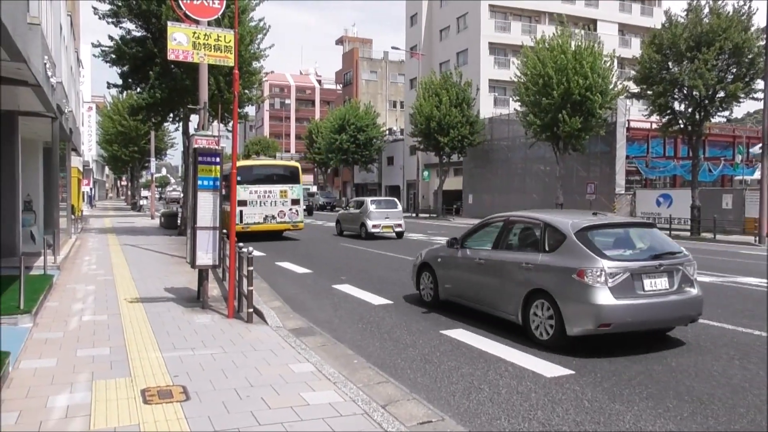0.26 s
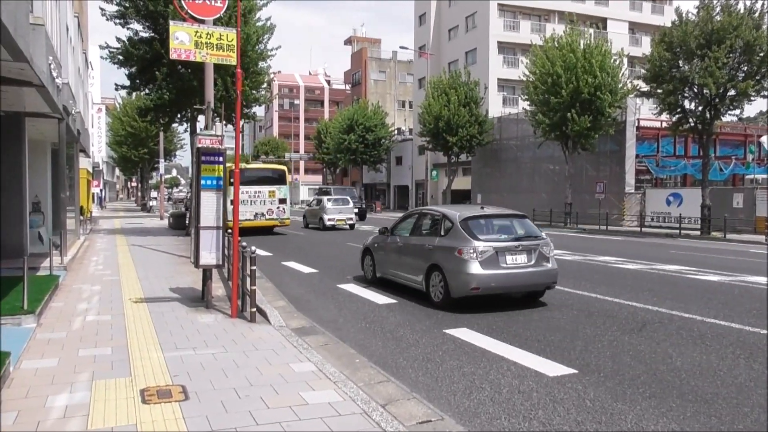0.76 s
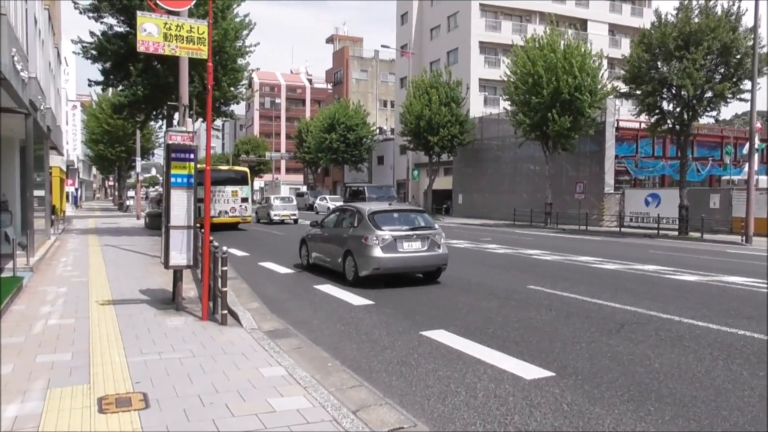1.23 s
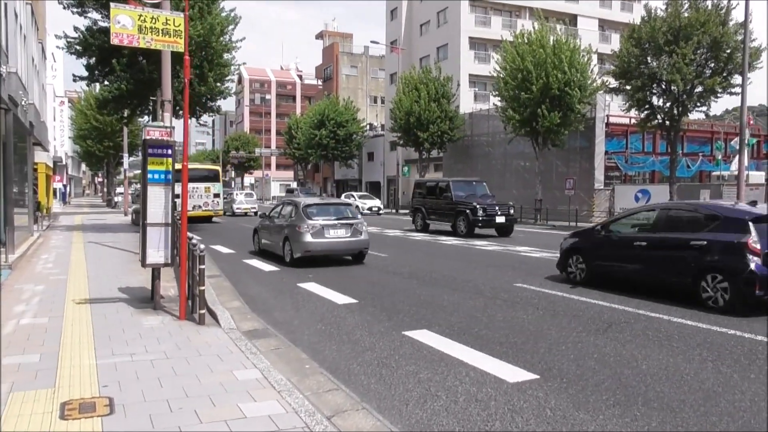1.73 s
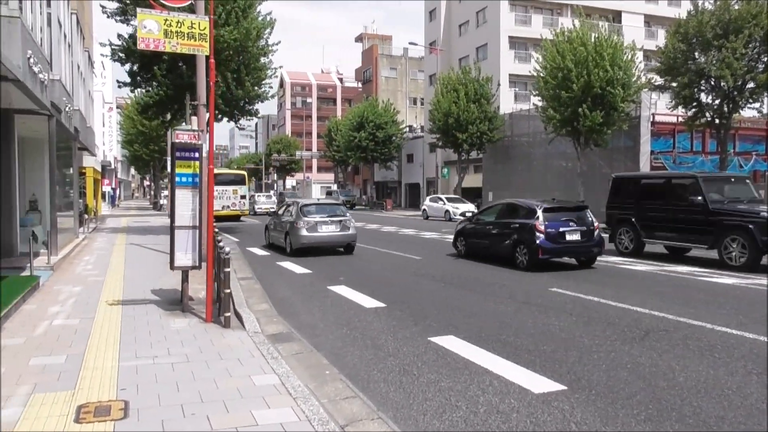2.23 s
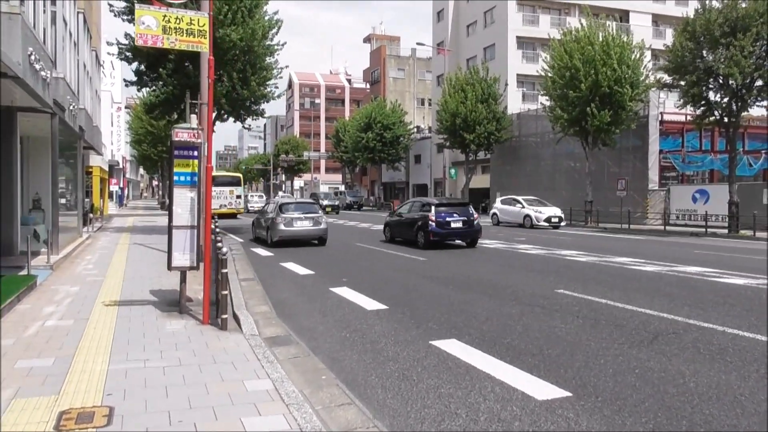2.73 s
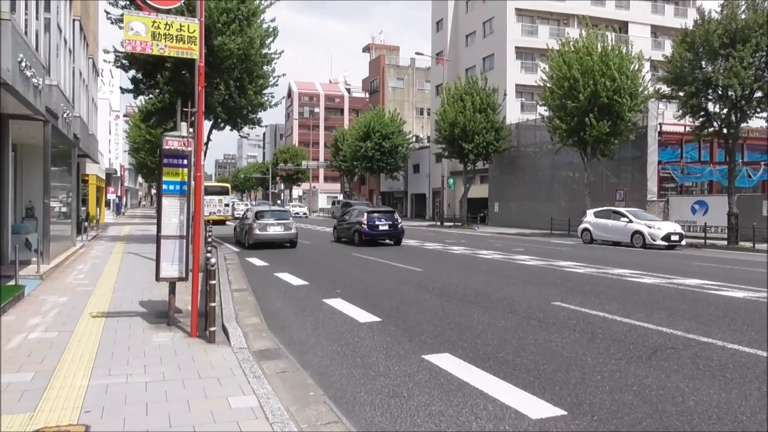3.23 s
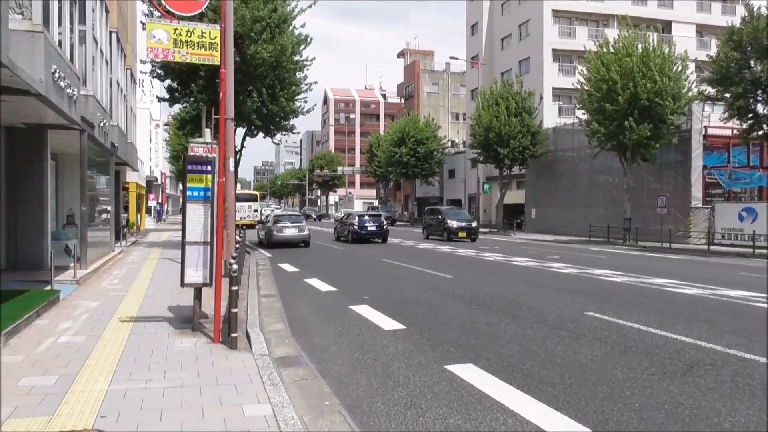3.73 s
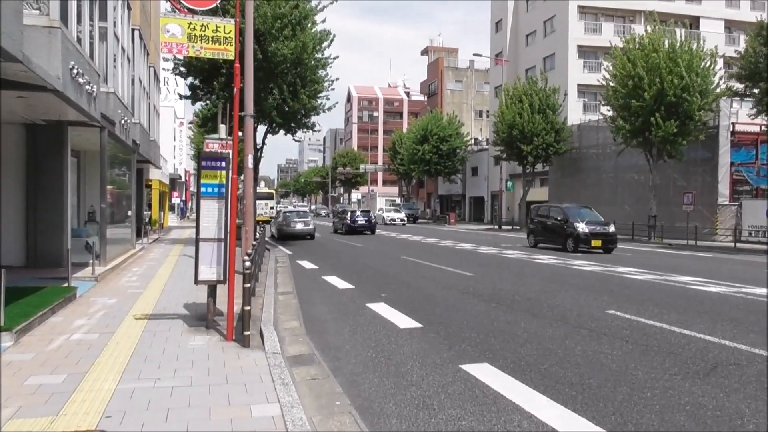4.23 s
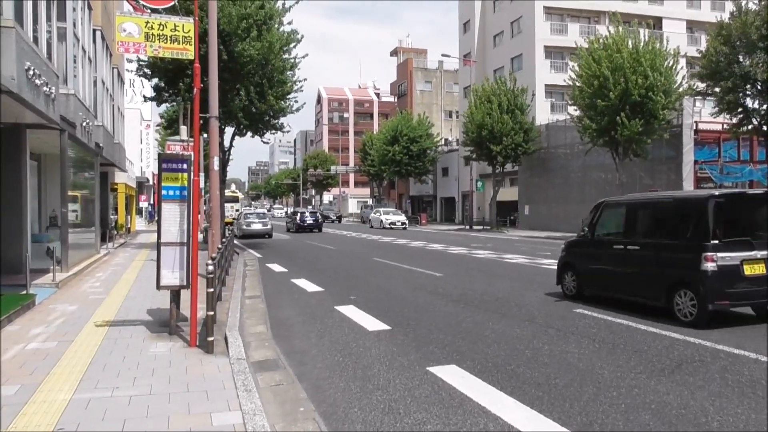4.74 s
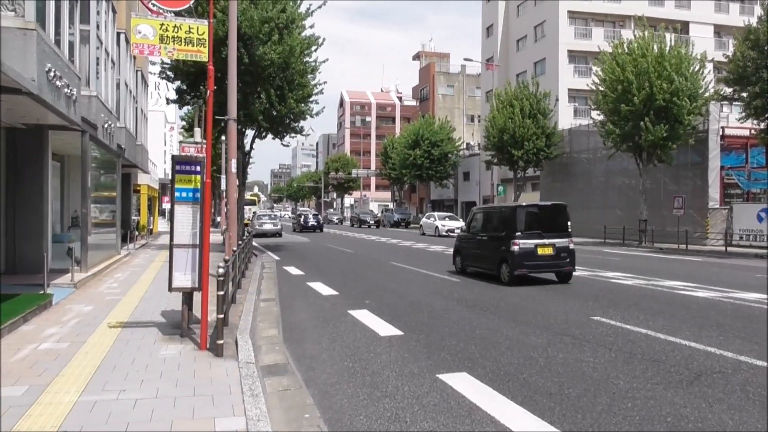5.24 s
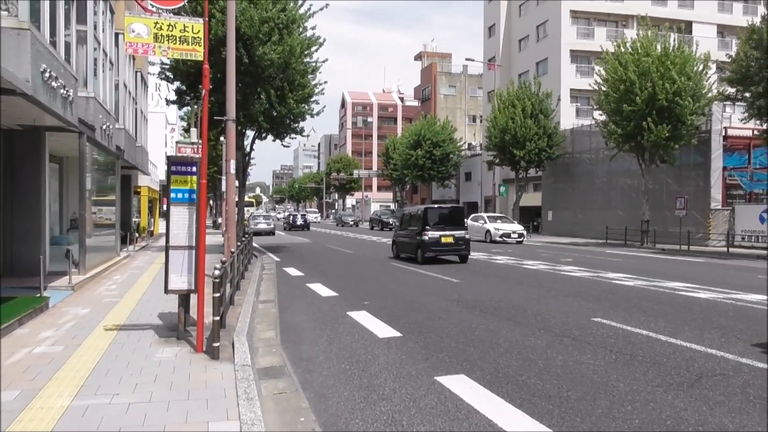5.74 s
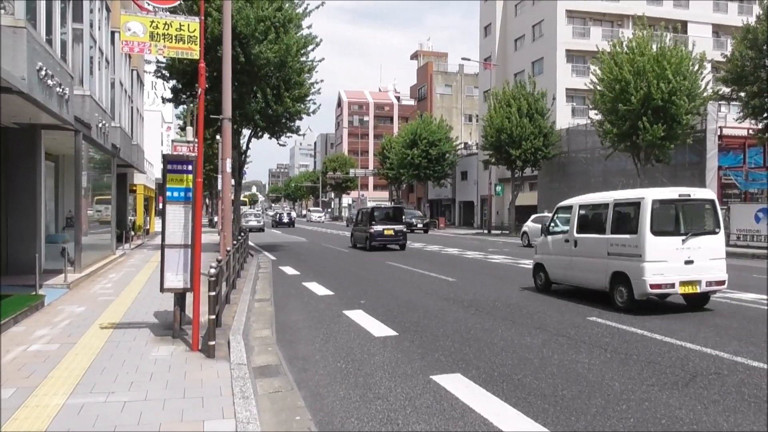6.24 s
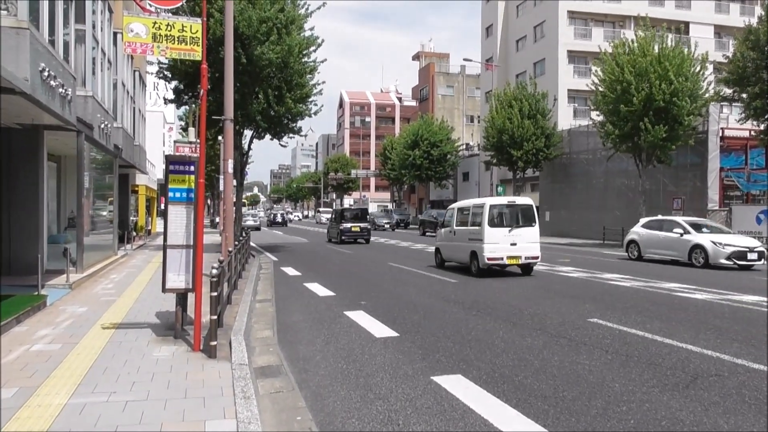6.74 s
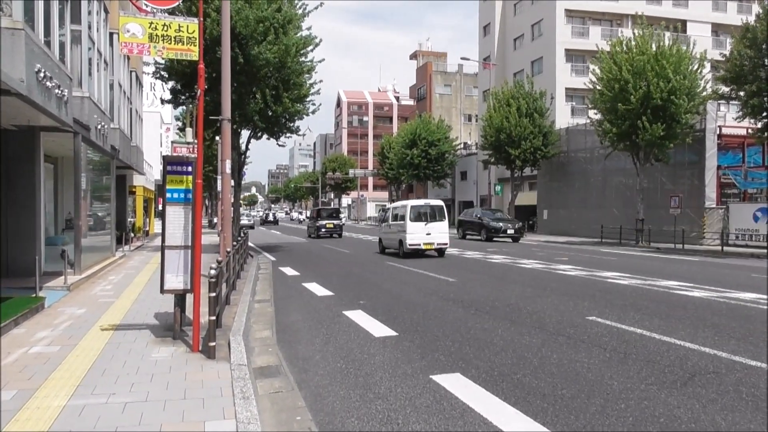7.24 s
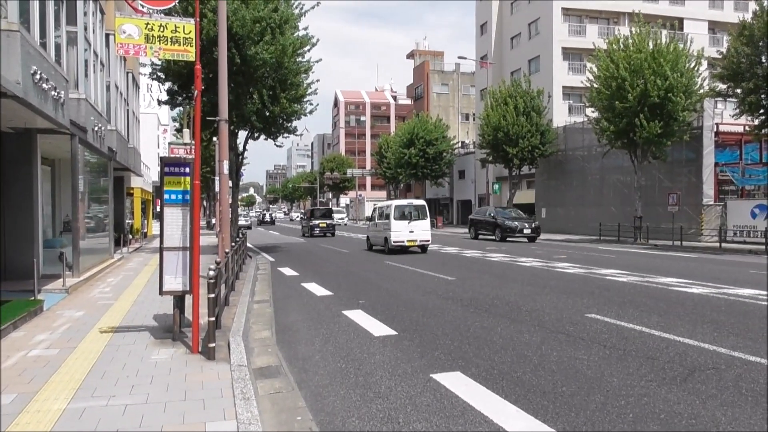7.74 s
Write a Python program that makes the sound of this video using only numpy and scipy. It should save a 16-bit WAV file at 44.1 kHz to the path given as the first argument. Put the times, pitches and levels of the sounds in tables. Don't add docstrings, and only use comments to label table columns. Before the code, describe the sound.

A diesel bus roars and booms as it accelerates away through a gear change, while passing cars hiss over asphalt on a busy city street.

```python
import sys
import numpy as np
from scipy import signal
from scipy.io import wavfile
from scipy.ndimage import uniform_filter1d

SR = 44100
rng = np.random.default_rng(int(sys.argv[2]) if len(sys.argv) > 2 else 0)


def how_loud(loudness_db):
    steps = np.asarray(loudness_db, float) / 20
    return 10 ** steps


def wrap_up_sound(samples):
    columns = np.atleast_2d(samples).T
    tamed = np.clip(columns, -1, 1)
    steps = np.round(tamed * 32767).astype(np.int16)
    wavfile.write(sys.argv[1], SR, steps)


N = 351918
TIME = np.arange(N) / SR
STEP = np.arange(0, 8, .02)


def evened(x):
    return x / np.sqrt(np.mean(x ** 2) + 1e-20)


def read(points, hz):
    f, value = np.transpose(points)
    return np.interp(np.log(hz + 1), np.log(f + 1), value)


def played(rows):
    s, *columns = np.transpose(rows)
    return [np.interp(TIME, s, column) for column in columns]


def summed(*levels_db):
    return 10 * np.log10(sum(how_loud(2 * db) for db in levels_db))


def panned(pair, level_db, pan_db):
    return pair * how_loud(level_db) * how_loud(np.array([[.5], [-.5]]) * pan_db)


def wander(span):
    width = max(int(span * SR), 2)
    smooth = uniform_filter1d(rng.standard_normal(N), width)
    return evened(uniform_filter1d(smooth, width))


def street_noise(colour, patchy_db, flicker_db, size=1024, sideways=((0, 1), (8, 1))):
    # pitch_hz, likeness (0-1)
    likeness = [(60, 0.59), (130, 0.99), (290, 0.92), (640, 0.77), (1400, 0.61), (3100, 0.88), (5400, 1),
                (9000, 1), (11500, 1), (15000, .9)]
    # pitch_hz, lead_radians
    left_lead = [(60, 0.47), (300, 0.15), (950, -0.04), (1900, 0.3), (4900, 0.5), (7200, 0), (8200, -0.8),
                 (9500, -2), (11000, -3), (15000, -2.5)]
    hop, hz = size // 4, np.fft.rfftfreq(size, 1 / SR)
    heard = hz[hz <= colour[-1][0]]
    a, b, c, d, chance = rng.standard_normal((N // hop + 5, len(heard), 5)).T
    flicker = evened(uniform_filter1d(chance[0], size=3))
    patches = uniform_filter1d(chance, size=9, axis=0)
    patches = evened(uniform_filter1d(patches, size=21, axis=1))

    same = np.clip(read(likeness, heard), 0, 1)[:, None]
    left = a + 1j * b
    right = same * left + np.sqrt(1 - same ** 2) * (c + 1j * d)
    frame_s = np.arange(len(flicker)) * hop / SR
    lead = np.outer(read(left_lead, heard), np.interp(frame_s, *np.transpose(sideways)))

    z = np.zeros((2, len(hz), len(flicker)), complex)
    z[:, :len(heard)] = [left, right * np.exp(-1j * np.maximum(lead, -np.pi))]
    z[:, :len(heard)] *= how_loud(read(colour, heard)[:, None] + patchy_db * patches + flicker_db * flicker)
    pair = signal.istft(z, nperseg=size, noverlap=size - hop)[1][:, :N]
    return pair / np.sqrt(np.mean(pair.mean(0) ** 2))


def tone(rows, waver, flutter_db, span, fade):
    hz, db = played(rows)
    phase = 2 * np.pi * np.cumsum(hz * (1 + waver * wander(span))) / SR
    on = np.clip(np.minimum(TIME - rows[0][0], rows[-1][0] - TIME) / fade, 0, 1)
    beat = on * np.cos(phase)
    return np.sqrt(2) * how_loud(db + flutter_db * wander(span)) * beat, beat


def bus_engine():
    # time_s, pitch_hz, level_db
    low_gear = [(1.4, 95, -36), (2.9, 92.4, -31), (4.2, 94.9, -29.5), (4.9, 95.7, -26)]
    high_gear = [(4.5, 75.5, -29), (5.6, 72.35, -33.5), (7.7, 65.5, -42)]
    # time_s, level_db
    effort = [(0, 0), (.5, 0), (1.1, 0), (2.1, 0), (2.5, -1), (2.85, 1.5), (3.3, -2), (3.5, -2),
              (3.9, -0.5), (4.45, 1.5), (4.62, 2.5), (4.8, -2), (5.2, -0.5), (6., -1), (6.45, 0),
              (6.7, 0.5), (7.3, 1.5)]
    # pitch_hz, level_db (per Hz)
    boom_colour = [(12, -57.5), (20, -42.5), (84, -4.5), (199, 0.5), (291, 1.5), (373, -4.5), (460, -7.5),
                   (600, -20), (1010, -120)]
    roar_colour = [(240, -18.5), (400, -9), (425, -4), (664, 1), (1000, -4.5), (1300, -17.5), (2200, -120)]
    drone_colour = [(400, -37), (520, -2), (600, 2.5), (660, -2), (780, 3.5), (860, -14), (1100, -48)]

    low, low_beat = tone(low_gear, waver=0.0067, flutter_db=-0.5, span=0.25, fade=0.35)
    high, high_beat = tone(high_gear, waver=0.0039, flutter_db=4.0, span=0.13, fade=0.31)
    firing = 1 + 0.1 * (low_beat + high_beat)

    effort_db = played(effort)[0]
    boom = street_noise(boom_colour, 0.77, 0.27, size=2048) * firing
    boom = panned(boom, -16.5 + 0.9 * effort_db, pan_db=3.5)
    roar = street_noise(roar_colour, 0.69, 0.13) * firing
    roar = panned(roar, -16.5 + 0.91 * effort_db, pan_db=1.15)

    load_from_s, load_to_s = 1.55, 3.27
    opening_db = 36 * (load_from_s - TIME)
    shutting_db = 55 * (TIME - load_to_s)
    building_db = 2 * (TIME - load_from_s)
    load_db = -22.5 + building_db - np.maximum(np.maximum(opening_db, shutting_db), 0)
    drone = panned(street_noise(drone_colour, .8, .3) * firing, load_db, pan_db=3.5)
    return boom + roar + drone + (low + high) * how_loud([[.1], [-3.3]])


def turbo():
    # time_s, level_db, length_s
    glints = [
        (1.25, -50.5, .12),
        (1.75, -46, .08),
        (2.2, -46.5, 0.17),
        (3.03, -49, .025),
    ]
    spool_s, top_s, rest_s = 1.08, 2.42, 3.2
    t = STEP[(STEP >= spool_s) & (STEP <= rest_s)]
    bend_hz_per_s2 = np.where(t < top_s, 1170, 1800)
    hz = 8660 - bend_hz_per_s2 * (t - top_s) ** 2
    fading_db = -51.5 - 4 * (t - spool_s)
    glints_db = [db - 6 * np.minimum(((t - s) / length) ** 2, 20) for s, db, length in glints]
    return np.transpose([t, hz, summed(fading_db, *glints_db)])


def echoed(x):
    # delay_s, level_db
    walls = [
        (.031, -5),
        (.058, -8.5),
        (.097, -9.5),
    ]
    return x + sum(how_loud(db) * np.roll(x, round(s * SR)) for s, db in walls)


def whistles():
    # time_s, pitch_hz, level_db
    whines = [
        [(0, 2580, -46), (.3, 2570, -42), (.8, 2620, -43), (1.2, 2610, -37), (1.4, 2620, -46)],
        [(7.2, 2530, -45.5), (7.3, 2580, -37), (7.45, 2530, -44.5)],
    ]
    whistle = echoed(tone(turbo(), waver=0.006, flutter_db=4.5, span=0.00704, fade=0.088)[0])
    for rows in whines:
        whistle = whistle + tone(rows, waver=0.032, flutter_db=3.0, span=0.0026, fade=0.041)[0]
    return whistle * how_loud([[1.2], [-1.2]])


def traffic():
    # nearest_s, hiss_db, tread_over_hiss_db, air_over_hiss_db, bearing (0 ahead - 1 abeam)
    passing = [(.05, -29.5, 3, -14, .3), (.45, -32.5, 2.5, -11.5, .3), (.85, -33, 5, -13.5, .3),
               (1.3, -32, 3.5, -16.5, .25), (1.85, -30.5, -0.5, -14.5, .2), (2.4, -32.5, 5, -12.5, 0.62),
               (2.75, -29, -5, -17, .9), (4.05, -38, 15, -25, .6), (4.5, -32.5, 11.5, -17, .65),
               (5.08, -33, 12, -15, .98), (5.55, -28.5, 5.5, -14, 1.1), (6.05, -33, 12.5, -5, 0.84),
               (6.45, -40.5, 15.5, -2, .3), (7.05, -40, 17, -5, .3)]
    s, hiss_db, tread_db, air_db, bearing = np.transpose(passing)[:, :, None]
    pass_s = 0.33
    near_db = hiss_db - 20 * np.log10(1 + ((STEP - s) / pass_s) ** 2)
    all_hiss_db = summed(-31.5, *near_db)
    all_tread_db = summed(-25, *near_db + tread_db)
    all_air_db = summed(-49.5, *near_db + air_db)
    far_bearing = 0.51
    share = how_loud(2 * (near_db - all_hiss_db))
    heard = far_bearing + ((bearing - far_bearing) * share).sum(0)
    return STEP, all_tread_db, all_hiss_db, all_air_db, heard


def cars():
    # pitch_hz, level_db (per Hz)
    tread_colour = [(530, -36.5), (900, -7.5), (1240, -2), (2000, -16), (2600, -57), (4400, -120)]
    hiss_colour = [(1060, -11.5), (1800, -3.5), (2170, -4.5), (3410, -10), (4120, -15), (4900, -23.5),
                   (5400, -25.5), (7020, -33.5), (11900, -120)]
    air_colour = [(2900, -30.5), (5000, -8.5), (6300, -4), (7300, 1), (8400, 0), (9500, -4.5), (10500, -8),
                  (11500, -13), (13000, -20), (14600, -24.5), (15600, -34)]
    passes = np.transpose(traffic())
    tread_db, hiss_db, air_db, bearing = played(passes)
    ahead_pan_db, abeam_pan_db = 2.5, -3
    pan_db = ahead_pan_db + (abeam_pan_db - ahead_pan_db) * bearing
    tread = panned(street_noise(tread_colour, 0.6, 0.74), tread_db, pan_db - 0.1)
    hiss = panned(street_noise(hiss_colour, 0.57, .7, size=512), hiss_db, pan_db)
    air = street_noise(air_colour, 0.93, 0.65, size=512, sideways=passes[:, [0, -1]])
    return tread + hiss + panned(air, air_db, pan_db)


def grit():
    # time_s, peak_db, left_right_db, ring_hz, t60_s (time to die away by 60 dB)
    stones = [(0.699, -37.5, -2, 9000, .01), (1.249, -33.5, -2, 9000, .01), (1.7072, -25, 8, 8500, 0.022),
              (1.929, -33, 0, 10000, .02), (2.0802, -28, 1, 8500, .008), (2.7018, -38, -3.5, 11000, .025),
              (3.4294, -39, -0.5, 10000, .02), (4.1197, -37, -1.5, 9000, .015),
              (7.2952, -24, -5, 6500, 0.011), (7.3047, -10.5, 1, 7430, 0.012),
              (7.3457, -24.5, 4, 7500, .012), (7.421, -39.5, 2, 13500, 0.018)]
    out, t = np.zeros((2, N)), np.arange(1500) / SR
    noises = rng.standard_normal((len(stones), 2, len(t)))
    blow = 5.0 * (t == t[round(.0003 * SR)])
    for (s, db, pan_db, hz, t60), noise in zip(stones, noises):
        puff = noise[0] + .7 * noise * [[0], [1]] + blow
        bright = signal.lfilter(*signal.iirpeak(hz, 1.9, SR), puff)
        bright = 0.45 * bright + signal.lfilter(*signal.iirpeak(hz, 3.2, SR), bright)
        tick = 1.04 * bright * how_loud(-60 * t / t60) * np.minimum(t / 0.00048, 1)
        at = round(s * SR)
        out[:, at:at + len(t)] += panned(tick, db, pan_db)
    return out


def wind():
    below = signal.butter(2, 70, fs=SR, output="sos")
    above = signal.butter(3, 33, "high", fs=SR, output="sos")
    low = signal.sosfilt(below, rng.standard_normal((2, N)))
    low = signal.sosfilt(above, low)
    return evened(low) * how_loud(-37 + 1.2 * wander(.4))


def van_shade_db():
    since_s = TIME - 4.7
    return -1.5 * np.exp(-np.maximum(since_s, 0) / 0.17) * np.clip(since_s / 0.046 + 1, 0, 1)


def scene():
    street = bus_engine() + whistles() + cars()
    return street * how_loud(van_shade_db()) + grit() + wind()


def top_cut(x):
    return signal.sosfilt(signal.butter(12, 15730, fs=SR, output="sos"), x)


def record(dry):
    power_db = 10 * np.log10(uniform_filter1d((dry ** 2).mean(0), 900) + 1e-12)
    fall_db = TIME * 59.0
    held_db = np.maximum.accumulate(power_db + fall_db) - fall_db
    over_db = np.maximum(held_db + 10.5, 0)
    x = dry / how_loud(0.24 * uniform_filter1d(over_db, 300))

    knee = 0.79
    straight = np.clip(x, -knee, knee)
    x = straight + (1 - knee) * np.tanh((x - straight) / (1 - knee))

    stop_s, after_t60_s = 7.4255, 0.045
    since = np.maximum(TIME - stop_s, 0)
    dull = signal.sosfilt(signal.butter(3, 3800, fs=SR, output="sos"), x)
    after = dull * how_loud(-24 - 60 * (since / after_t60_s) ** 2.0) * (since < .06)
    x = x * np.clip((stop_s - TIME) / .0008, 0, 1) + after * (since > 0)
    return top_cut(x)


dry = scene()
out = record(dry)
wrap_up_sound(out)
```